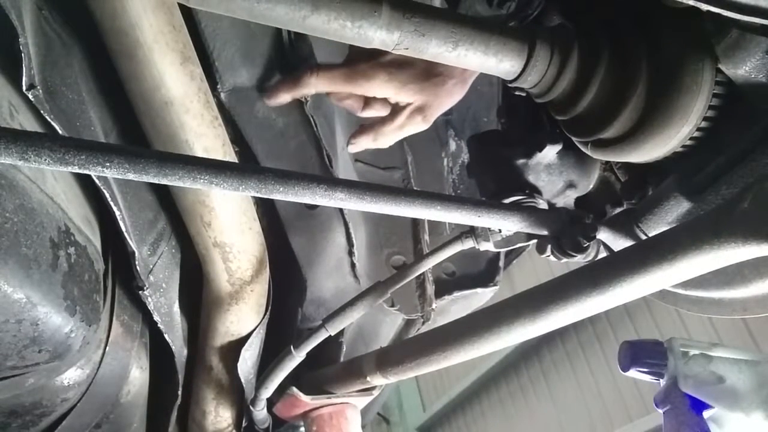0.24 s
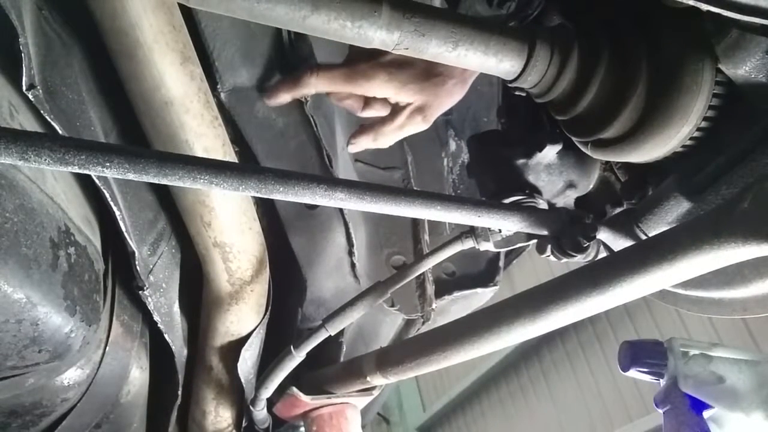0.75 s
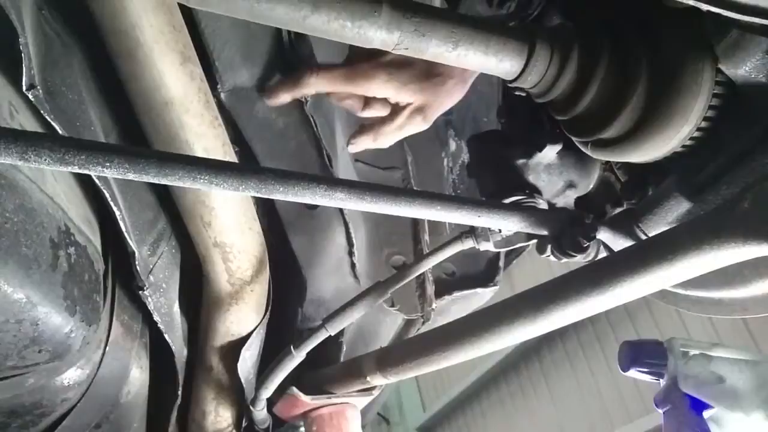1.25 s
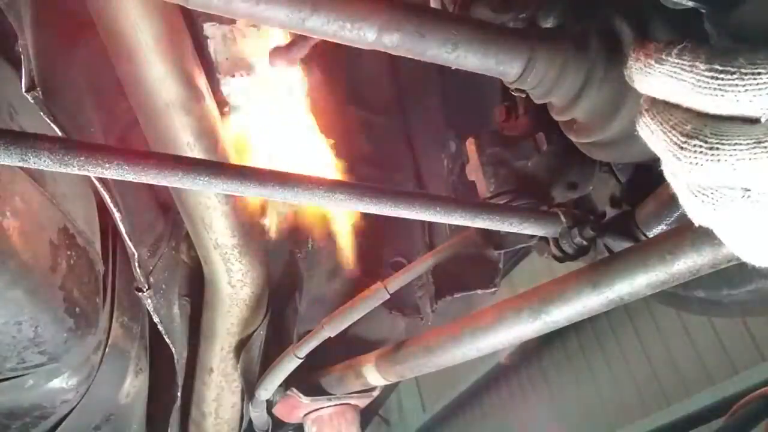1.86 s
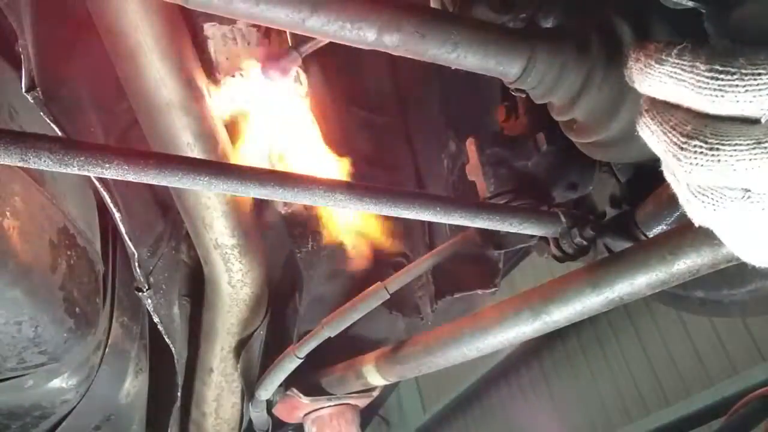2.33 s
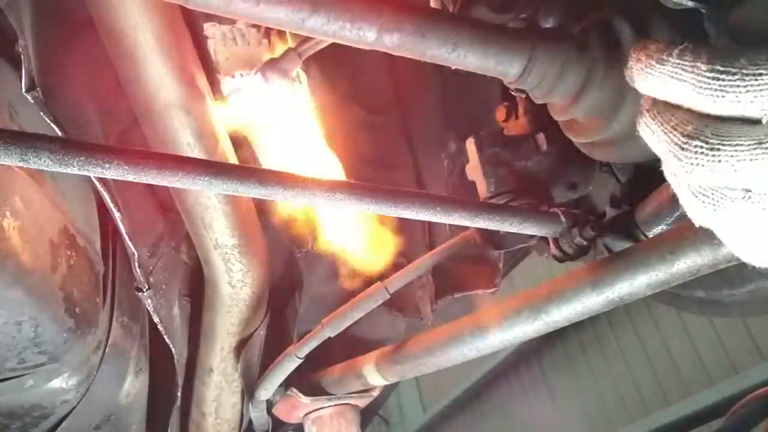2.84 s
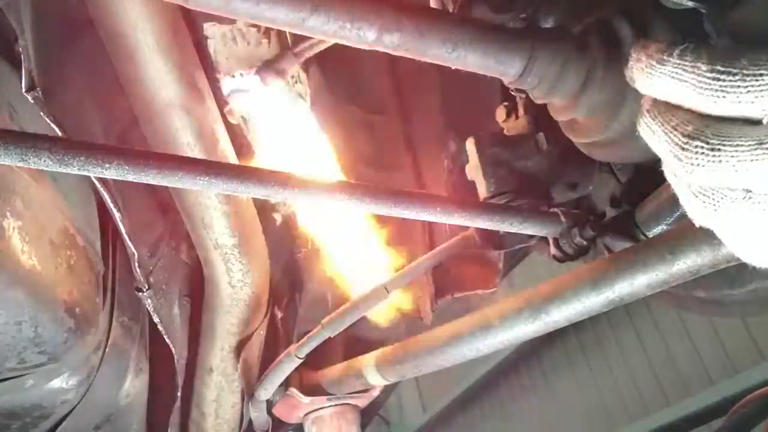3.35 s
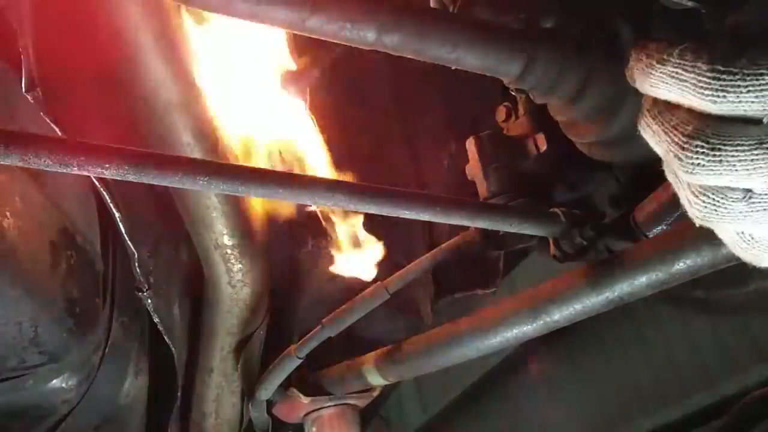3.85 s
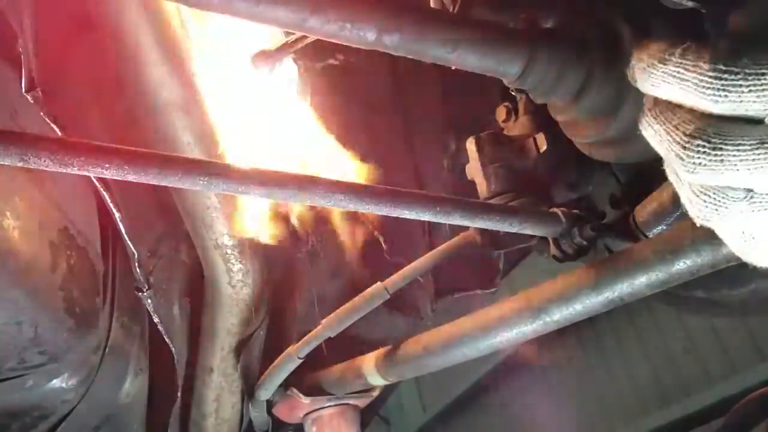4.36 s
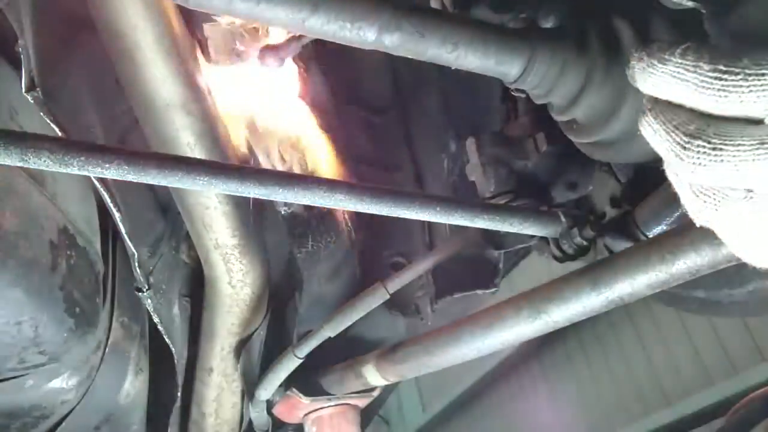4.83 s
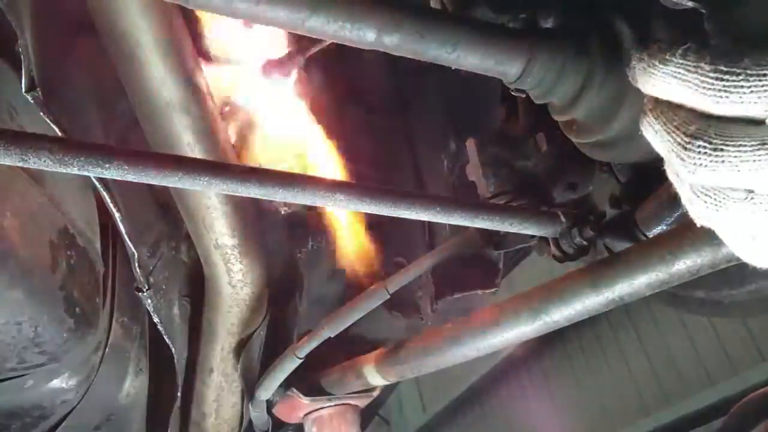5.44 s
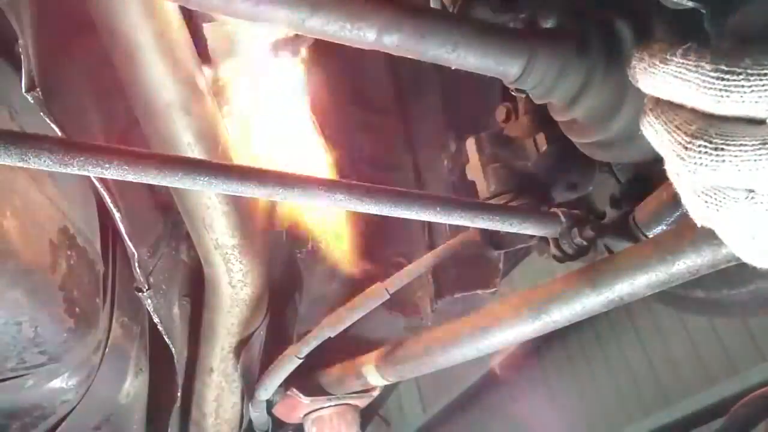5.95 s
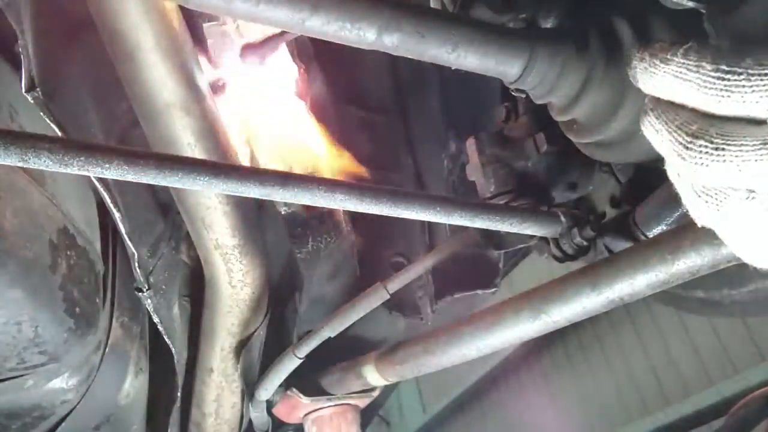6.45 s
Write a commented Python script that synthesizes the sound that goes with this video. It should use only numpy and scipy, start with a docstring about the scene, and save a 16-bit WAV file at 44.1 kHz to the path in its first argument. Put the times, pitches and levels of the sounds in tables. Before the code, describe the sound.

A gas torch is already burning at 0 s and continues to the end at about 6.7 s, very close to a phone under a car. The dominant layer is a bright, dense hiss and sizzle, very strong in the high treble, surging irregularly several times a second with tiny dips between. Beneath it lies a quieter fluttering flame roar and low rumble, flaring more strongly around 3.8, 4.2 and 4.5 s. Short sharp spits of melt are scattered throughout, more frequent from 4 s. Air bumps the microphone softly near 0.7 s, then thumps with small cracks at 4.3, 4.7-4.95 and 6.0 s, and softer at 6.35 s. Nearby steel panels give a hollow, shifting, comb-like colour, with hardly any room echo. The sound is nearly mono, with a faint steady side hiss, and ends without dying away.

```python
"""Gas cutting torch under a car

A gas torch cuts the steel frame close to a hand-held phone. Its flame is fluttering noise, a roar over a
low rumble; the oxygen jet hisses on the steel and the melt sizzles and spits, as brighter noise.
Nearby panels return short, shifting echoes of hiss and sizzle; the underbody lifts and cancels bands.
Steps of air pressure thump the microphone, and a faint steady hiss differs between the ears."""
import sys
import numpy as np
from scipy import signal
from scipy.fft import rfft, irfft, next_fast_len
from scipy.io import wavfile
from scipy.ndimage import uniform_filter1d, map_coordinates

SR = 44100
rng = np.random.default_rng(int(sys.argv[2]) if len(sys.argv) > 2 else 0)


def inscribe(sig):
    """Save sig as 16-bit PCM at rate SR to the path in sys.argv[1].

    A 1-D sig is mono; a 2-D sig holds one channel per row.
    Samples are clipped to [-1, 1] before scaling.
    """
    pcm = np.round(np.clip(np.atleast_2d(sig).T, -1, 1) * 32767)
    wavfile.write(sys.argv[1], SR, pcm.astype(np.int16))


N = 295029
ENVELOPE_STEP = 32  # samples between envelope points

# The flame burning calmly between flares, before trim: (time [s], roar level [dB], rumble level [dB])
CALM_FLAME = [(0.0, -33.5, -40.5), (0.8, -37, -46), (1.7, -38, -42), (2.7, -37, -46.5), (3.7, -35.5, -45),
              (4.4, -35.0, -45), (5.05, -31.0, -42.0), (5.3, -38.0, -47), (5.9, -36, -44),
              (6.55, -33, -43.0), (6.69, -35, -42.0)]
# Flares of the flame, before trim: (time [s], length [s], roar level [dB], rumble level [dB])
FLARE_EVENTS = [(0.074, 0.059, -30, -53), (0.213, 0.055, -36, -37), (0.491, 0.18, -29, -45),
                (0.893, 0.18, -31, -45), (1.321, 0.059, -32.5, -38.0), (1.871, 0.1, -30.5, -41),
                (1.99, 0.022, -26.5, -40), (2.178, 0.18, -32.5, -36.5), (2.354, 0.24, -29.5, -38),
                (2.83, 0.2, -31.5, -32), (2.95, 0.25, -32.5, -34), (3.234, 0.19, -31.0, -38.5),
                (3.447, 0.27, -29.0, -38.5), (3.752, 0.067, -26.5, -39), (3.831, 0.076, -22, -28),
                (3.946, 0.27, -30, -33.5), (4.242, 0.035, -24.5, -29), (4.42, 0.15, -29.5, -35),
                (4.503, 0.079, -23.5, -31), (4.803, 0.14, -26, -46), (5.11, 0.071, -30, -34.5),
                (5.342, 0.083, -28.0, -37), (5.504, 0.084, -26.5, -38), (5.624, 0.15, -32, -39.5),
                (5.94, 0.21, -32.5, -39), (6.306, 0.26, -28, -38)]
FLARE_ATTACK_S, FLARE_RELEASE_S = 0.03, 0.04
# The flame falters between flares: (time [s], half length [s], level change [dB])
FLAME_FALTERS = [(.78, .035, -3), (1.525, 0.018, -7), (2.11, .035, -3), (3.44, .025, -1.5),
                 (3.95, 0.01, -2), (5.905, .025, -3)]
# Relative spectrum of the roar: (frequency [Hz], level [dB])
ROAR_SPECTRUM = [(40, -22), (120, -10), (210, 0), (265, -6.5), (440, -1), (620, -8.5), (1000, -0.5),
                 (1450, -3.5), (1900, -4), (2700, -2.5), (5000, -6), (15000, -21)]
# Relative spectrum of the rumble: (frequency [Hz], level [dB])
RUMBLE_SPECTRUM = [(20, -17), (45, -13), (75, 3.5), (130, -1.5), (210, -8.5), (280, -19.5), (400, -13),
                   (700, -31), (3000, -55)]

# Steady cutting between gushes, before trim: (time [s], jet level [dB], sizzle level [dB])
STEADY_CUTTING = [(0.0, -24, -17.0), (0.9, -25, -18.5), (1.701, -24.5, -17.5), (2.4, -22, -20.0),
                  (3.1, -28.0, -17.5), (3.7, -20.5, -21.5), (4.3, -27, -19.0), (4.8, -26.5, -20.5),
                  (5.3, -21.5, -20.0), (5.9, -25, -20.0), (6.69, -25.5, -20.5)]
# Gushes of melt blown out by the jet, before trim:
# (time [s], length [s], jet level [dB], sizzle level [dB], coarseness: lower treble of the sizzle [dB])
GUSH_EVENTS = [(0.01, 0.054, -21.5, -16, -13), (0.088, 0.074, -23.5, -13.5, -3.5),
               (0.274, 0.067, -18, -15, -2), (0.394, 0.13, -26.5, -15.5, -1), (0.603, 0.077, -33, -26, 8),
               (0.666, 0.058, -26.0, -11.5, -7), (0.791, 0.06, -20.5, -18.5, -3),
               (0.85, 0.071, -24.5, -16, -13), (0.98, 0.11, -41, -17, 1), (1.087, 0.11, -20, -18, 1),
               (1.238, 0.026, -18.5, -23, -5.5), (1.376, 0.067, -41, -15.0, -10.0),
               (1.495, 0.12, -23, -17, 0), (1.672, 0.046, -24.5, -11.5, -25), (1.821, 0.11, -30, -20.5, -2),
               (1.99, 0.058, -21.5, -16.5, 8), (2.201, 0.033, -19.5, -17, 12),
               (2.278, 0.042, -25, -16.0, 12), (2.327, 0.137, -45, -18, -1), (2.478, 0.052, -23, -18.5, -5),
               (2.592, 0.068, -27.5, -14, 2), (2.7, 0.074, -26, -23, 1), (2.861, 0.043, -25.5, -21.5, 15),
               (2.997, 0.085, -34, -14.5, -1.5), (3.165, 0.05, -17, -17.5, 4), (3.283, 0.1, -26.5, -20, -7),
               (3.495, 0.068, -23.5, -17, 9), (3.644, 0.067, -27, -21.0, 12),
               (3.738, 0.066, -29, -19.5, 5.5), (3.836, 0.12, -28, -21, 11.5), (4.077, 0.093, -39, -24, -2),
               (4.32, 0.038, -37, -12, -3.5), (4.415, 0.037, -28.0, -20, 7.0), (4.484, 0.13, -25, -30, 3),
               (4.603, 0.13, -34, -18.5, -6), (4.825, 0.129, -28, -31, -12), (5.01, 0.046, -39, -15, -6.0),
               (5.163, 0.1, -21.5, -16.5, -9), (5.29, 0.091, -24.5, -19, 11.5),
               (5.392, 0.087, -35, -16, 3.5), (5.49, 0.113, -37, -21, -4), (5.674, 0.11, -30, -12.5, -7.5),
               (5.822, 0.068, -25.5, -15.5, -2), (6.082, 0.046, -24.5, -16, 1.5),
               (6.164, 0.098, -29.5, -11, -6.5), (6.382, 0.052, -26.0, -12.5, -8),
               (6.464, 0.087, -26, -18.5, 3.5), (6.568, 0.1, -29, -14.5, -1.5)]
GUSH_ATTACK_S, GUSH_RELEASE_S = 0.018, 0.029
# The hiss sags for an instant: (time [s], half length [s], level change [dB])
HISS_LULLS = [(0.231, 0.023, -9), (0.37, 0.032, -6.5), (0.765, 0.028, -2.5), (1.345, .014, -1.5),
              (1.465, 0.011, -2.5), (1.81, 0.051, -3.5), (2.575, .016, -3), (2.935, 0.011, -1),
              (3.26, .014, -2.5), (3.456, 0.023, -3.5), (4.02, 0.023, -3.5), (4.37, 0.021, -3),
              (4.768, 0.009, -3), (5.09, 0.0092, -3.5), (5.63, .01, -3), (5.995, 0.029, -5.5),
              (6.305, 0.04, -3)]
SIZZLE_LULL_SHARE = 0.39  # share of each lull that the top of the sizzle follows
# Relative spectrum of the jet: (frequency [Hz], level [dB])
JET_SPECTRUM = [(300, -13), (1000, -63), (2000, -12.5), (3100, -6), (3600, -4), (4200, 1.5), (5100, 3),
                (6400, 2), (8000, -0.5), (11000, -2.5), (16000, -12)]
# Relative spectrum of the sizzle: (frequency [Hz], level [dB])
SIZZLE_SPECTRUM = [(1000, -55), (3000, -15), (6000, -14.5), (7600, -1.5), (10000, 3.5), (12000, 5),
                   (14000, 6), (15400, 9), (16000, -23)]
# Spurts of melt: (time [s], level before its envelope [dB], centre frequency [Hz], decay length [s])
SPIT_EVENTS = [(0.016, -7.5, 14500, .025), (0.161, -16, 9050, .014), (0.44, -18, 8000, .016),
               (1.248, -21, 12000, 0.019), (1.877, -12, 13000, 0.035), (2.535, -10, 14000, 0.011),
               (2.78, -18, 12000, .012), (4.069, -13, 11500, .012), (4.122, -11, 11400, 0.013),
               (4.123, -20, 5530, .014), (4.289, -11, 14000, 0.019), (4.727, -11, 12900, .012),
               (4.785, -12.5, 12200, 0.022), (4.920, -14, 13000, .012), (5.06, -9, 12300, 0.017),
               (5.61, -17, 5170, 0.0074), (5.645, -12, 13100, 0.014), (5.646, -18.5, 5700, 0.0072),
               (6.132, -19, 5800, 0.019), (6.537, -14, 7000, 0.014)]

# Echoes off the nearest panels: (nominal delay [ms], relative strength [ratio])
PANEL_ECHOES = [(.2, 0.06), (.6, 0.05), (0.818, 0.25), (1.15, 0.14), (1.47, 0.17), (2.1, 0.23),
                (2.75, 0.13), (3.7, 0.31)]
# Echo paths as the torch is shifted along the frame: (time [s], relative path length [ratio])
ECHO_PATH = [(0, 1.02), (1.7, 1.05), (3.1, 0.99), (3.9, 1.04), (4.7, 1.03), (6.69, 1)]
# Resonances of the underbody hollows: (frequency [Hz], width [Hz], lift [dB])
HOLLOW_RESONANCES = [(303, 43, 3), (365.8, 19, 8), (801, 22, 8), (1003, 31, 5), (1166, 135, 5.5),
                     (1398, 25, 4.5), (1522, 83, 7), (1830, 37, 7.5), (2580, 42, 5), (2720, 94, 3),
                     (3570, 270, 6), (5340, 420, 1.8)]
# Cancellation between frame and floor pan: (nominal frequency [Hz], width [Hz], lift before depth factor [dB])
FLOOR_NULLS = [(1784, 61, -7), (2360, 100, -1), (3065, 59, -5.5), (3740, 98, -1.5), (4110, 35, -16),
               (5470, 330, -2.5)]

# Puffs of air on the microphone: (time [s], pressure step before the vent [full scale], rise time [ms])
AIR_PUFFS = [(.711, 0.095, 6.6), (0.731, 0.085, .8), (0.7344, -0.039, 0.9), (4.327, 0.23, 0.57),
             (4.698, 0.074, 2), (4.711, -0.17, 1.4), (4.734, -0.11, 0.32), (4.75, 0.19, 0.54),
             (4.791, 0.19, 0.37), (4.795, -0.14, 0.61), (4.952, -0.27, 0.37), (5.977, 0.21, 0.33),
             (5.996, 0.31, 0.21), (6.030, -0.072, 1.8), (6.354, 0.17, 2)]
# Relative spectrum of the air rush in a puff: (frequency [Hz], level [dB])
RUSH_SPECTRUM = [(100, -3), (400, -2), (800, 0), (1800, -12), (5000, -33)]
# Relative spectrum of the faint hiss at the sides: (frequency [Hz], level [dB])
SIDE_SPECTRUM = [(100, -12), (600, -6.5), (1400, -20), (2500, 10.0), (3400, 17.5),
                 (4800, -12), (6500, -34), (14000, -55)]
TOP_HZ = 15750  # upper band edge of the phone


def undb(db):
    """Level definition: decibels to amplitude gain."""
    return 10 ** (np.asarray(db) / 20)


def unit(x):
    """Normalisation to an rms of 1."""
    return x / np.sqrt(np.mean(x ** 2))


def curve(rows):
    """Linear interpolation of (time [s], value) rows at every sample."""
    return np.interp(np.arange(N) / SR, *np.transpose(rows))


def shape(x, db_of):
    """Linear filtering: multiply the spectrum by a gain in dB that depends on frequency."""
    size = next_fast_len(len(x))
    hz = np.maximum(np.arange(size // 2 + 1) * SR / size, 1)
    return irfft(rfft(x, size) * undb(db_of(hz)), size)[:len(x)]


def morph(x, db_of):
    """Time-varying filtering: a gain in dB for each frequency (rows) and sample number (columns)."""
    hz, seconds, spectra = signal.stft(x, SR, nperseg=1024, noverlap=768)
    at = np.minimum((seconds * SR).astype(int), N - 1)
    filtered = spectra * undb(db_of(hz[:, None], at))
    return signal.istft(filtered, SR, nperseg=1024, noverlap=768)[1][:N]


def colour(x, points):
    """Spectral colouring: a gain interpolated on a log frequency axis, at rms 1."""
    f, db = np.transpose(points)
    return unit(shape(x, lambda hz: np.interp(np.log(hz), np.log(f), db)))


def bells(hz, rows):
    """Resonance curves: a sum of bells given as (frequency [Hz], width [Hz], level [dB])."""
    return sum(db / (1 + (2 * (hz - f) / width) ** 2) for f, width, db in rows)


def walk(rate):
    """Slow random variation: levels held for 1 / rate seconds and smoothed twice, at rms 1."""
    hold = max(int(SR / rate), 1)
    held = rng.standard_normal(N)[np.arange(N) // hold]
    return unit(uniform_filter1d(uniform_filter1d(held, hold), hold))


def patches(hz, at, width_hz, life_s):
    """Random field over frequency and time: swells a band wide and a moment long, at rms 1."""
    field = rng.standard_normal((256, 256))
    place = np.broadcast_arrays(hz / width_hz, at / SR / life_s)
    return unit(map_coordinates(field, place, order=1, mode="mirror"))


def surges(rows, attack_s, release_s):
    """Growth and decay of power: each (time [s], length [s], ..) row rises, holds and dies away."""
    rows = np.array(rows)
    age = np.arange(0, N, ENVELOPE_STEP) / SR - rows[:, :1]
    rise = np.clip(age / attack_s, 0, 1)
    decay = np.exp(-np.maximum(age - rows[:, 1:2], 0) / release_s)
    return (rise * decay) ** 2


def total(envelopes, weights):
    """Superposition: the weighted sum of the envelopes at every sample."""
    return np.interp(np.arange(N), np.arange(0, N, ENVELOPE_STEP), weights @ envelopes)


def swell(steady, envelopes, peaks_db):
    """Addition of powers: the level in dB of surges on top of a steady (time [s], level [dB]) curve."""
    return 10 * np.log10(undb(curve(steady)) ** 2 + total(envelopes, undb(peaks_db) ** 2))


def sags(rows):
    """Gaussian dips of level, in dB, from (time [s], half length [s], level change [dB]) rows."""
    t = np.arange(N) / SR
    return sum(db * np.exp(-((t - s) / length) ** 2) for s, length, db in rows)


def turbulence(points, flutter_db, flutter_rate):
    """Turbulent noise: the strength of the gas noise flutters as eddies pass."""
    return colour(rng.standard_normal(N) * undb(flutter_db * walk(flutter_rate)), points)


def flame(roar_db=1.0, rumble_db=0.15, lick_db=1.0, billow_db=1.0):
    """Combustion noise: a fluttering roar over the lumpy rumble of the plume; both swell with each flare."""
    calm, flares = np.array(CALM_FLAME), np.array(FLARE_EVENTS)
    flaring = surges(flares, FLARE_ATTACK_S, FLARE_RELEASE_S)
    roar_level = swell(calm[:, [0, 1]], flaring, flares[:, 2]) + roar_db
    roar = turbulence(ROAR_SPECTRUM, flutter_db=1.18, flutter_rate=70) * undb(roar_level)
    rumble_level = swell(calm[:, [0, 2]], flaring, flares[:, 3]) + rumble_db
    rumble = turbulence(RUMBLE_SPECTRUM, flutter_db=4.0, flutter_rate=40) * undb(rumble_level)
    billowing = rumble * undb(billow_db * walk(14))
    return (roar + billowing) * undb(sags(FLAME_FALTERS) + lick_db * walk(28))


def cutting():
    """Shared drive: gushes and lulls set jet level, sizzle level and sizzle coarseness, all in dB."""
    steady, gushes, lull_db = np.array(STEADY_CUTTING), np.array(GUSH_EVENTS), sags(HISS_LULLS)
    gushing = surges(gushes, GUSH_ATTACK_S, GUSH_RELEASE_S)
    jet_db = swell(steady[:, [0, 1]], gushing, gushes[:, 2])
    sizzle_db = swell(steady[:, [0, 2]], gushing, gushes[:, 3])
    # each gush colours the sizzle by its share of the power
    coarse_power = total(gushing, undb(gushes[:, 3]) ** 2 * gushes[:, 4])
    coarse_db = coarse_power / undb(sizzle_db) ** 2 + (1 - SIZZLE_LULL_SHARE) * lull_db
    return jet_db + lull_db, sizzle_db + SIZZLE_LULL_SHARE * lull_db, coarse_db


def panels(x, strength, wander_ms, wander_rate):
    """Early reflection: short echoes whose paths change as the sounding spot moves over the steel."""
    i, path, out = np.arange(N), curve(ECHO_PATH), x
    for ms, share in PANEL_ECHOES:
        lag = (ms * path + wander_ms * walk(wander_rate)) * SR / 1000  # in samples
        out = out + strength * share * map_coordinates(x, [i - lag], order=2)
    return unit(out)


def jet(level_db, waver_db=0.94):
    """Jet noise: the oxygen stream breaks up on the frame and hisses."""
    hiss = turbulence(JET_SPECTRUM, flutter_db=1.0, flutter_rate=140)
    hiss = panels(hiss, strength=0.9, wander_ms=0.045, wander_rate=5.4)
    return hiss * undb(level_db + waver_db * walk(35) + 0.3)


def melt(level_db, coarse_db, knee_hz=10700, waver_db=0.97):
    """Two-phase flow noise: gas tears through liquid steel, a bright sizzle, fuller when the spray is coarse."""
    sizzle = turbulence(SIZZLE_SPECTRUM, flutter_db=1.22, flutter_rate=150)
    # the spot is small and jumps about, so its echoes comb the treble strongly
    sizzle = panels(sizzle, strength=2.05, wander_ms=0.049, wander_rate=14)
    # coarseness acts below the knee
    sizzle = morph(sizzle, lambda hz, at: (coarse_db[at] + 0.2) / (1 + (hz / knee_hz) ** 12))
    return sizzle * undb(level_db + waver_db * walk(35) + 0.18)


def spits(width_octaves=0.23, attack_s=0.00035):
    """Transient band noise: a drop of melt is blown away in a short, sharp spurt."""
    out, t = np.zeros(N + SR), np.arange(SR // 8) / SR
    for s, db, hz, length in SPIT_EVENTS:
        def band(f):
            """Band-pass response around the centre frequency, in dB."""
            return -10 * np.log10(1 + (np.log2(f / hz) / width_octaves) ** 4)
        spurt = unit(shape(rng.standard_normal(len(t)), band))
        envelope = (1 - np.exp(-t / attack_s)) * np.exp(-(t / length) ** 2)
        start = max(int(s * SR), 0)
        out[start:start + len(t)] += undb(db) * spurt * envelope
    return out[:N]


def underbody(x, jet_db, fill_db=-22, fill_span_db=3, drift=0.008, patchy_db=1.5, flicker_db=1.0,
              depth_wander_db=3):
    """Resonance and interference: the hollow of frame and floor pan lifts some bands and cancels others."""
    # a small sounding spot cancels deeply; a strong, spreading jet fills the nulls
    depth = 1.27 / (0.5 + np.exp((jet_db - fill_db) / fill_span_db))
    depth = depth * undb(depth_wander_db * walk(5.2))
    shift = 1 + drift * walk(3.2)

    def wandering(hz, at):
        """Moving interference: drifting nulls, and treble bands that swell slowly and flicker quickly."""
        nulls = depth[at] * bells(hz * shift[at], FLOOR_NULLS)
        swells = patchy_db * patches(hz, at, width_hz=675, life_s=0.08)
        flicker = flicker_db * patches(hz, at, width_hz=2180, life_s=0.03)
        return nulls + hz / (hz + 1500) * (swells + flicker)
    return morph(shape(x, lambda hz: bells(hz, HOLLOW_RESONANCES)), wandering)


def puffs(leak_hz=2.84, crack_db=-10, crack_s=0.0033):
    """Pressure equalisation: steps on the diaphragm leak through its vent, a thump with a crack of rushing air."""
    t = np.arange(N) / SR
    pressure = sum(size * np.clip((t - s) * 1000 / rise_ms, 0, 1) for s, size, rise_ms in AIR_PUFFS)
    vent = signal.butter(1, leak_hz, "high", fs=SR)
    thump = signal.lfilter(*vent, signal.lfilter(*vent, pressure))
    # the rush follows the speed of the pressure change and decays
    speed = np.abs(np.diff(pressure, prepend=0))
    rush = signal.lfilter([1], [1, -np.exp(-1 / (crack_s * SR))], speed)
    crack = rush * colour(rng.standard_normal(N), RUSH_SPECTRUM)
    return thump + undb(crack_db) * crack


def side_hiss(level_db=-50.0):
    """Opposite phase: a faint, steady coloured noise has reversed sign in the two ears."""
    hiss = undb(level_db) * colour(rng.standard_normal(N), SIDE_SPECTRUM)
    return hiss * np.array([[1], [-1]])


def scene():
    """Superposition: torch and puffs are alike in both ears; only the side hiss differs."""
    jet_db, sizzle_db, coarse_db = cutting()
    sources = flame() + jet(jet_db) + melt(sizzle_db, coarse_db) + spits()
    torch = underbody(sources, jet_db)
    return torch + puffs() + side_hiss()


def record(dry):
    """Saturation and band limiting: the phone rounds the highest peaks and cuts the top."""
    rounded = dry / (1 + (np.abs(dry) / 0.9) ** 6) ** (1 / 6)
    low_pass = signal.ellip(10, 0.05, 60, TOP_HZ, fs=SR, output="sos")
    return signal.sosfiltfilt(low_pass, rounded)


dry = scene()
out = record(dry)
inscribe(out)
```